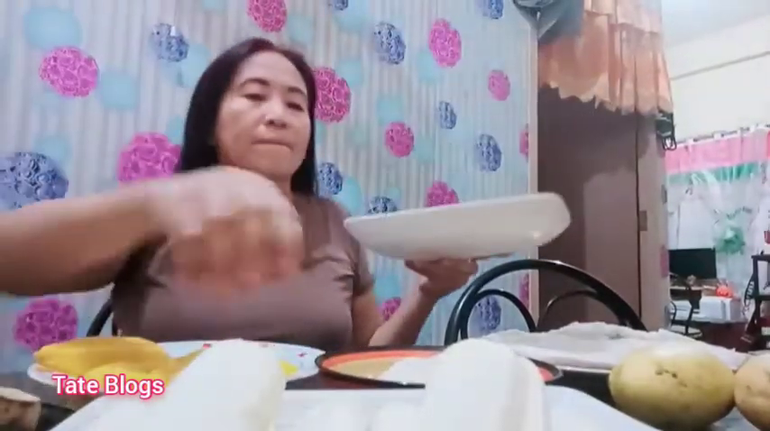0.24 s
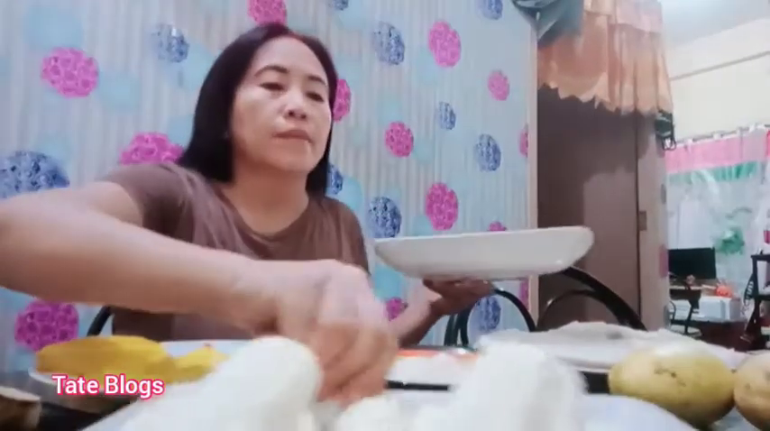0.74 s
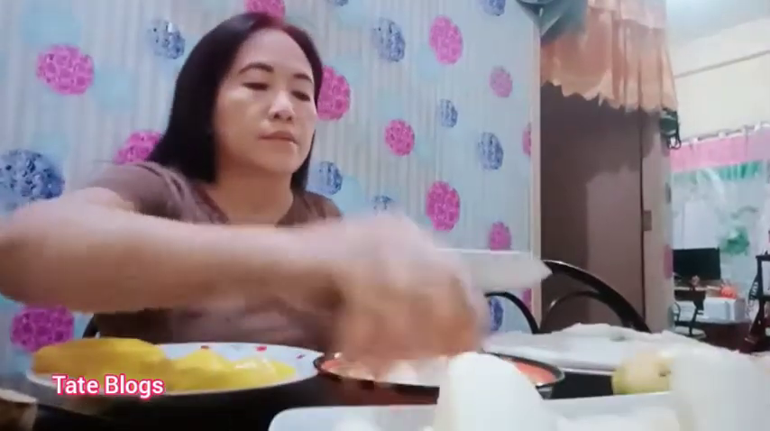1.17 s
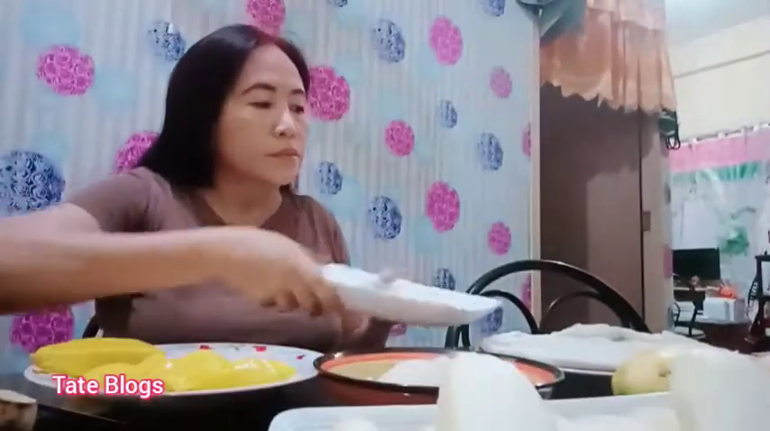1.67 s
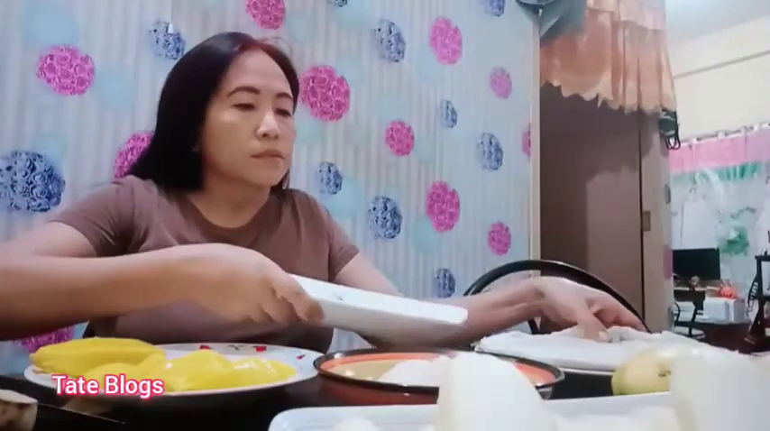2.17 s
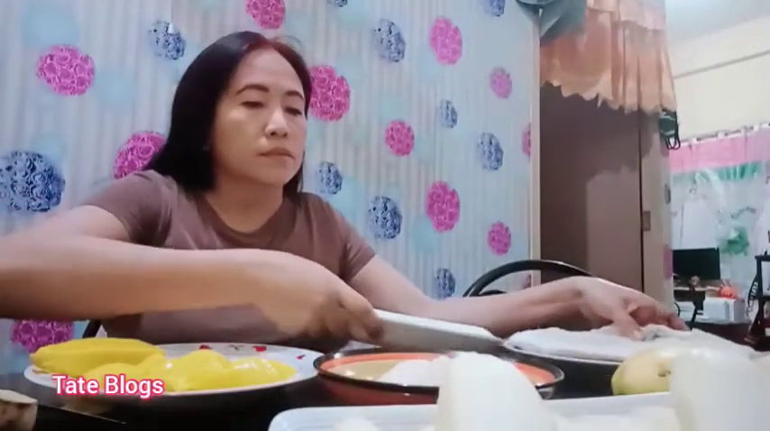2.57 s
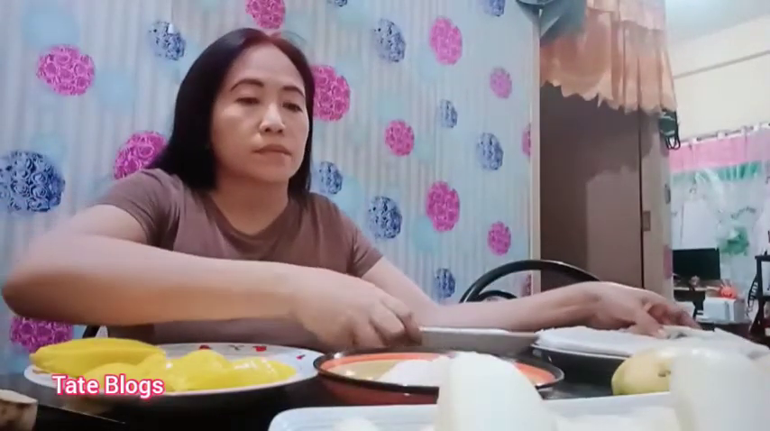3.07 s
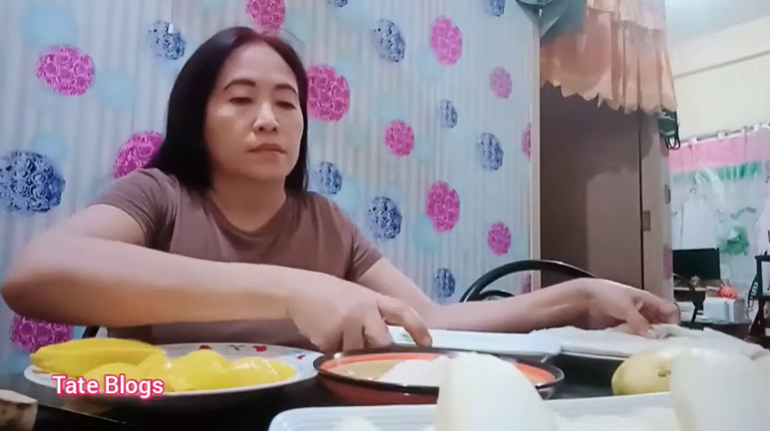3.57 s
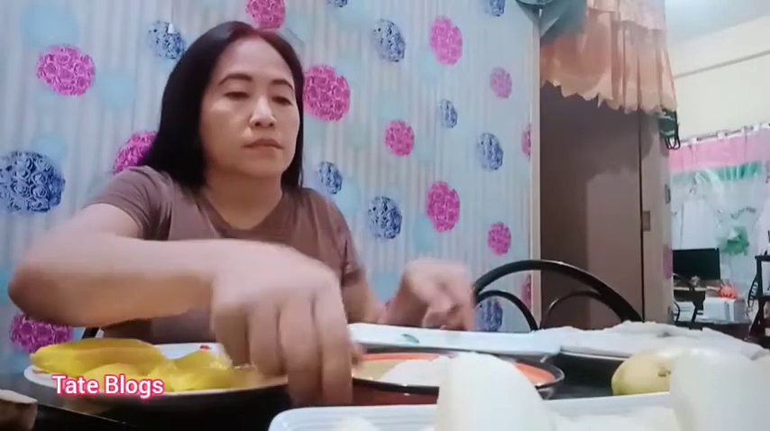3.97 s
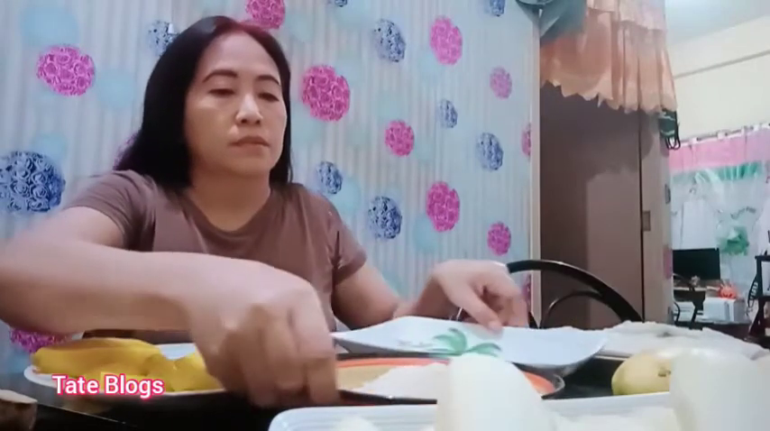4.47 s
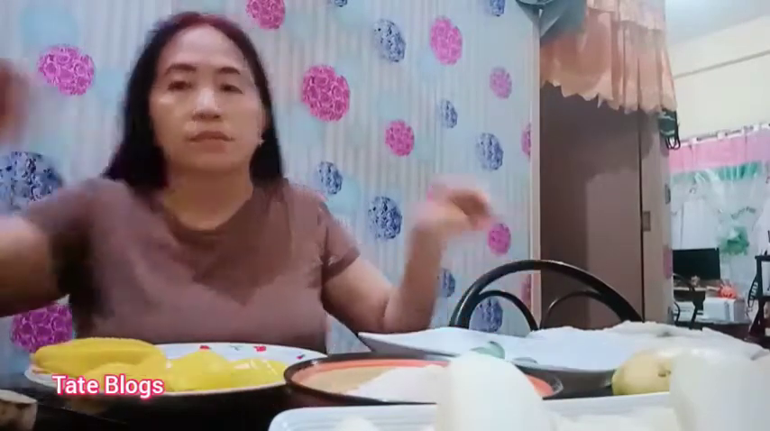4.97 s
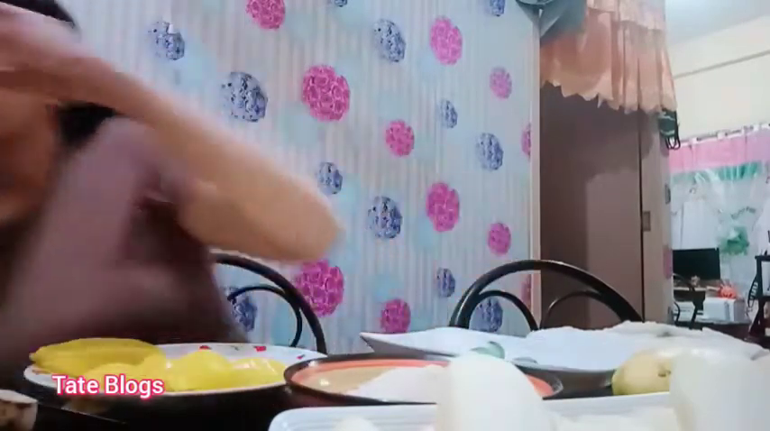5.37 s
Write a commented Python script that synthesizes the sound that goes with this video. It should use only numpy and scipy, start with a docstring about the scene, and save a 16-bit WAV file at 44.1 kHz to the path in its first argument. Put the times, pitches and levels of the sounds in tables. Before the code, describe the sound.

Light tray rustling, then sharp crockery clacks and a loud bowl set-down on a wooden tabletop, over quiet fan hum.

```python
"""Over steady air hush and a humming fan (noise and narrow-band tones), fingers rustle on a knocked tray.
A held plate, platter, saucer and plate follow on a wooden table, close to a phone in a small room;
a spoon chinks, a side plate and a bowl are set down, and last a chair shifts.
Knocks are short chattering bursts, drags streams of slips; both drive damped sines and snaps of noise
for the thing and the tabletop. Sparse decaying echoes make the room."""
import sys
import numpy as np
from scipy import signal
from scipy.io import wavfile
from scipy.ndimage import uniform_filter1d

SR = 44100
rng = np.random.default_rng(int(sys.argv[2]) if len(sys.argv) > 2 else 0)


def voltage_ratio(level):
    """Linear amplitude factor for a level in decibels (scalar or array-like)."""
    return 10 ** (np.asarray(level, float) / 20)


def to_wav(sig):
    """Store sig (one row per channel, or 1-D mono) as 16-bit WAV at the path in sys.argv[1].

    Samples outside -1..1 are clipped; the rate is SR.
    """
    pcm = np.clip(np.atleast_2d(sig), -1, 1) * 32767
    pcm = np.round(pcm).astype(np.int16)
    wavfile.write(sys.argv[1], SR, pcm.T)  # frames by channels


N = 247401


def evened(x):
    """Scales to rms 1."""
    return x / np.sqrt(np.mean(x ** 2) + 1e-20)


def read(points, hz):
    """Reads a spectrum on a log-frequency axis."""
    point_hz, value = np.transpose(points)
    return np.interp(np.log(hz + 1), np.log(point_hz + 1), value)


def add(mix, start_s, sound):
    """Mixes a sound in at start_s."""
    part = mix[round(start_s * SR):][:len(sound)]
    part += sound[:len(part)]


# Air noise spectrum. Each row: frequency in Hz, relative density in dB.
HUSH = [(15, -51), (25, -11), (84, -16.5), (111, 14.5), (145, -10.5), (170, -9.5), (277, 1.5), (309, -10),
        (344, -3), (962, -7), (1040, -9.5), (1130, -11), (3620, -19.5), (4870, -40), (16000, -61.5)]


def hush():
    """Air noise, shaped in frequency, with drifting patches and a slow swell."""
    frames, hz = N // 256 + 5, np.fft.rfftfreq(1024, 1 / SR)
    real, imag, patches = rng.standard_normal((frames, 513, 3)).T
    patches = uniform_filter1d(patches, 10, axis=0)  # across frequency
    patches = evened(uniform_filter1d(patches, 16, axis=1))  # across time
    swell = evened(uniform_filter1d(rng.standard_normal(frames), 40))
    drift_db = 1.3 * patches + 0.6 * swell
    spectrum = (real + 1j * imag) * voltage_ratio(read(HUSH, hz)[:, None] + drift_db)
    noise = signal.istft(spectrum, nperseg=1024, noverlap=768)[1][:N]
    return voltage_ratio(-49.5) * evened(noise)


# Fan tones. Each row: pitch in Hz, bandwidth in Hz, rms level in dB, steady part relative to noise rms.
FAN = [(113.5, 7.7, -62.5, 0.28), (177.3, 13.4, -56.5, 0.85), (880, 7.1, -66.5, 0.084),
       (1059, 31, -59.5, .1), (5076, 12, -86.5, 3)]


def fan():
    """Each tone is a steady part plus a narrow band of noise around its pitch."""
    t_s, out = np.arange(N) / SR, np.zeros(N)
    for hz, width_hz, level_db, steady in FAN:
        noise = rng.standard_normal(N) + 1j * rng.standard_normal(N)
        slow = signal.lfilter(*signal.butter(2, width_hz / 2, fs=SR), noise)
        wander = steady + slow / np.std(slow)
        tone = (wander * np.exp(2j * np.pi * hz * t_s)).real
        out += voltage_ratio(level_db) * evened(tone)
    return out


def harder(force, treble_db, hz=1800):
    """A harder contact carries more force above hz; two shelves make the turn steep."""
    for _ in range(2):
        low = signal.lfilter(*signal.butter(1, hz, fs=SR), force)
        force = low + voltage_ratio(treble_db / 2) * (force - low)
    return force


def grains(count, per_s, spread_db):
    """Sparse slips of random sign and uneven size."""
    draw, size, sign = rng.random((count, 3)).T
    uneven = voltage_ratio(-spread_db * np.log(size + 0.0054))
    return (draw < per_s / SR) * uneven * np.sign(sign - 0.5)


# Ringing modes of each thing. Each row: frequency in Hz, level before spot scatter in dB,
# t60 in seconds before body() limits it and grip shortens it.
FOOD_TRAY = [(2020, 7, 0.016), (2430, -14, 0.017), (2850, 0, 0.016), (3580, 3, 0.012), (4230, -18, 0.014),
             (6700, 10, 0.0097), (7860, 11.5, .008)]
HELD_PLATE = [(480, 2.5, 0.054), (890, 15.5, 0.0091), (1130, -11, .02), (1500, 16, 0.011),
              (1976, 12, 0.012), (2556, 3, 0.032), (3115, -5.5, 0.11), (3640, -19, 0.025),
              (4280, -2, 0.014), (4820, -3, 0.049), (6130, 1, 0.023), (8100, -9, 0.027)]
PLATTER = [(697, -6.5, 0.07), (1088, 5, 0.11), (1100, -14, .06), (1590, -11, 0.13), (1930, -8, 0.038),
           (2840, -1, 0.023), (3536, 1.5, 0.032), (4270, -18, .03), (4940, -22, 0.025), (5650, -9, 0.02)]
SAUCER = [(296, 5, 0.11), (354, 3, 0.11), (482, 3, 0.13), (1086, 4, 0.026), (1694, 4.5, 0.033),
          (2176, -0.5, 0.024), (2614, 0, 0.021), (2940, -19, 0.029), (3740, -8, 0.021)]
PLATE = [(351, -6.5, 0.037), (1100, -5, 0.01), (1170, 0.5, 0.026), (1510, 6, 0.011), (1753, 8, 0.024),
         (2060, 9.5, 0.0087), (2475, 7.5, 0.016), (2450, -3, 0.016), (2883, 4, 0.036), (3120, 1, 0.017),
         (3060, -3, 0.018), (3420, 2, 0.025), (3720, 1, 0.021), (6040, 0.5, 0.022), (6840, -14, 0.044)]
SPOON = [(1540, 3, 0.089), (2523, 9.5, 0.037), (3800, 6, 0.11), (5200, -2, .12), (7000, 0, .12)]
SIDE_PLATE = [(605, 8, 0.0033), (875, 4, 0.0071), (1230, -2, 0.0084), (1540, 7, 0.021), (1780, 5, 0.024),
              (2520, 6.5, 0.013), (2770, -11, 0.034), (3700, 1.5, 0.038), (5130, -11.5, .04)]
BOWL = [(730, -9, 0.052), (1058, -1, 0.072), (1340, -7.5, 0.029), (1613, 5.5, 0.017), (1670, -4.5, 0.081),
        (1760, 8, 0.018), (2040, -3, 0.019), (2260, 2.5, 0.013), (2380, 0, 0.032), (2895, 3.5, 0.023),
        (3410, 1.5, 0.015), (3680, -1, 0.016), (4580, -27, 0.023), (6150, -5, 0.025)]
CHAIR = [(670, 18, 0.0069), (935, 2, 0.014), (3000, -22, 0.0055)]


def body(modes, crack_db, spot_db, grip=1, crack_ms=2.23):
    """Unit-energy answer to a push at a chance spot: dying sines and a snap of countless damped modes."""
    t_s, (hz, mode_db, t60_s) = np.arange(6000)[:, None] / SR, np.transpose(modes)
    mode_db = mode_db + spot_db * rng.standard_normal(len(hz))  # each spot favours other modes
    decay_db = 60 * grip * t_s / np.clip(t60_s, 0.004, 0.5)
    tones = (voltage_ratio(mode_db - decay_db) * np.sin(2 * np.pi * hz * t_s)).sum(1)
    snap = rng.standard_normal(len(t_s)) * np.exp(-t_s[:, 0] * 1000 / crack_ms)
    both = tones / np.linalg.norm(tones) + voltage_ratio(crack_db) * snap / np.linalg.norm(snap)
    return both / np.linalg.norm(both)


# Tabletop modes. Each row: frequency in Hz, level before spot scatter in dB, t60 in seconds before grip.
TABLETOP = [(112.7, 6.5, 0.095), (202, 3, 0.054), (256, -9, 0.095), (310, -1.5, 0.031), (359, -1.5, 0.086),
            (480, 3.5, 0.01), (630, -10.5, 0.021), (760, -10, 0.0091)]


def tabletop():
    """The wooden table's damped modes, pushed at a chance spot."""
    return body(TABLETOP, crack_db=-31, spot_db=0.5, grip=0.8)


# Things by name. Each row: modes, mean slips per second when dragged, snap beside the ring in dB,
# thud drive beside the ring drive when dragged in dB.
THINGS = {"tray": (FOOD_TRAY, 2300, 9.3, -2.5), "held plate": (HELD_PLATE, 9000, -1.5, -4.5),
          "platter": (PLATTER, 2100, 1.7, -1.7), "saucer": (SAUCER, 1000, -22, -14),
          "plate": (PLATE, 2975, 0, 0.5), "side plate": (SIDE_PLATE, 2000, 0.5, -2.5),
          "bowl": (BOWL, 2700, 3.8, -3), "spoon": (SPOON, 1000, -16, -9), "chair": (CHAIR, 6100, 3.3, -7)}
# Knocks by thing. Each row: start in seconds, ring peak in dB, thud peak in dB (both before room and
# microphone), treble force in dB, chatter decay in ms before limits.
KNOCKS = { "tray": [(0.021, -18.5, -43, 19, 14.6), (0.458, -20, -48, 4, 1.5), (0.468, -18, -39, 23, 11),
          (0.529, -21, -30.5, 2, 2.8), (0.563, -26, -41, 3, 5.6), (0.629, -29.5, -40, -4, 18),
          (0.665, -27, -41, -2, 4.7), (0.819, -21.5, -27.5, -1, 4.7), (0.848, -31, -31, -2, 9.4),
          (0.863, -23.5, -22.5, -8.5, 3), (0.919, -28.5, -41, 11, 2.5)],
          "held plate": [(1.402, -39, -48, -25, 4), (1.839, -38, -27, 10, 8.2),
          (2.053, -41, -29.5, -33, 6.3), (2.144, -30, -45, 22, 3.4), (2.265, -28.5, -38, 0, 7.8),
          (2.458, -34, -20, -22, 4.8), (2.469, -24.5, -28, -35, 10)],
          "platter": [(2.656, -4.5, -16, 4.5, 0.42), (2.692, -6.5, -24, 4.5, 0.98)],
          "saucer": [(2.84, -21, -46.5, 10.5, 8.5), (2.914, -25, -38, 10.5, 2.1),
          (2.966, -25.5, -44, -6, 2), (3.045, -32, -46, 5, 4.9), (3.069, -34, -45, -5, 4.2)],
          "plate": [(3.096, -13, -24.5, 0, 6.4), (3.118, -12.5, -31.5, 0.5, 11),
          (3.144, -15, -30, -8.5, 21), (3.2, -22, -35, -8, 9), (3.228, -24, -22.5, 3, 6.4),
          (3.391, -6.5, -35, 4, 17), (3.409, -8, -18, -3.5, 8.2)], "spoon": [(3.574, -37.5, -43, -12, 9),
          (3.592, -37.5, -55, 0, 12)], "side plate": [(4.135, -23, -54, -18, 2.1),
          (4.216, -26.5, -32, -8, 27), (4.244, -28, -18.5, -19, 4), (4.317, -18, -18.5, -32, 8.9)],
          "bowl": [(4.442, -14, -19, -13, 4.6), (4.453, -8, -20.5, -8, 15), (4.567, -10, -12, 4, 33),
          (4.581, 3.5, -7.5, 10, 6.7), (4.611, -7.5, -14, -16, 4.2), (4.624, -13, -8.5, 1, 3.8),
          (4.647, -5.5, -17, 2.5, 5.2)], }


def knock(thing, start_s, ring_db, thud_db, treble_db, chatter_ms):
    """One blow, heard through the thing and through the table under it."""
    modes, _, crack_db, _ = THINGS[thing]
    t_ms = np.arange(4096) / SR * 1000
    chatter_ms = np.clip(chatter_ms, 0.5, 40)
    bounces = evened(grains(4096, per_s=6000, spread_db=2.0))
    blow = bounces * np.exp(-t_ms / chatter_ms)  # the rim settles in tiny bounces
    blow *= 1 - np.exp(-t_ms / (0.033 * chatter_ms))
    blow /= np.linalg.norm(blow)
    blow[0] = 2.9 / chatter_ms  # a clean blow puts its force in the first touch
    ring = signal.fftconvolve(harder(blow, treble_db), body(modes, crack_db, spot_db=1.0))
    thud = signal.fftconvolve(blow, tabletop())
    return start_s, voltage_ratio(ring_db) * ring / abs(ring).max() + voltage_ratio(thud_db) * thud / abs(thud).max()


# Drags, rustles and rattles by thing. Each row: start in seconds, time before the fade in seconds,
# slip drive before lumps in dB, fade in dB per second, treble force in dB.
DRAGS = { "tray": [(0.03, 0.022, -54.5, 98, 12.5), (0.44, 0.024, -51, 156, 9), (0.52, 0.1, -58, 28, 8.5),
         (0.795, 0.035, -50.5, 62, 6.5)], "held plate": [(1.81, 0.026, -52.5, 400, -6),
         (2.13, 0.12, -60, 150, 15.5), (2.262, 0.067, -41.5, 57, 3.5), (2.48, 0.011, -40, 396, -19),
         (2.53, 0.23, -65.5, 199, 24.5)], "platter": [(2.7, 0.017, -27, 498, -1)],
         "saucer": [(2.9, 0.27, -48, 100, -15)], "plate": [(3.1, 0.039, -26.5, 155, -2),
         (3.19, 0.21, -60, 153, 13), (3.415, 0.005, -23.5, 282, -3)],
         "side plate": [(4.02, 0.034, -53, 180, 5), (4.135, 0.059, -36, 90, -10),
         (4.215, 0.11, -32, 199, -14.5), (4.315, 0.0079, -26, 250, -16)],
         "bowl": [(4.46, 0.013, -20.5, 704, -1.5), (4.575, 0.085, -16.5, 420, 1.5)],
         "chair": [(5.17, 0.12, -48, 95, -11), (5.28, 0.12, -47, 51, 0)], }


def drag(thing, start_s, hold_s, ring_db, fade_db_per_s, treble_db, spots=5):
    """A lumpy stream of slips that sets in, holds and fades, ringing the thing and the table."""
    modes, slips_per_s, crack_db, thud_db = THINGS[thing]
    rise_ms, longest = 6, 24000  # longest in samples
    t_s = np.arange(longest) / SR
    fade_db = fade_db_per_s * np.maximum(t_s - hold_s, 0)
    pressure = np.minimum(t_s * 1000 / rise_ms, 1) * voltage_ratio(ring_db - fade_db)
    lumps_db = 1.73 * evened(uniform_filter1d(rng.standard_normal(longest), size=350))
    slips = evened(grains(longest, slips_per_s, spread_db=3.0)) * pressure * voltage_ratio(lumps_db)
    spot = rng.integers(0, spots, longest)  # the rim touches down now here, now there
    out = voltage_ratio(thud_db) * signal.fftconvolve(slips, tabletop())
    for k in range(spots):
        force = harder(slips * (spot == k), treble_db)
        damped = body(modes, crack_db, spot_db=1.5, grip=1.35)  # the hand damps the ring
        out = out + signal.fftconvolve(force, damped)
    return start_s, out


# Room decay. Each row: frequency in Hz, t60 in seconds.
ROOM = [(150, 0.41), (1000, 0.34), (4000, 0.35), (10000, 0.33)]


def room(x):
    """Sparse echoes of random sign, each band dying at its own speed."""
    taps, at = np.zeros(SR // 2), np.arange(150, SR // 2 - 20, 20)
    taps[at + rng.integers(0, 20, len(at))] = rng.choice([-1., 1.], len(at))
    hz, t_s, bands = signal.stft(taps, SR, nperseg=256)
    decay = voltage_ratio(-60 * t_s / read(ROOM, hz)[:, None])
    tail = signal.istft(bands * decay, SR, nperseg=256)[1]
    return signal.oaconvolve(x, tail / np.linalg.norm(tail))[:N]


# Response to nearby sounds. Each row: frequency in Hz, gain in dB.
MICROPHONE = [(30, -33), (90, -21.5), (170, 0.65), (3000, 3), (4200, -3.5), (5400, -20), (8500, -25.5),
              (10500, -42), (16000, -47.5)]


def microphone(x):
    """The microphone's causal response to nearby sounds: dull above the presence range."""
    hz = np.abs(np.fft.fftfreq(4096, 1 / SR))
    log_gain = np.log(voltage_ratio(read(MICROPHONE, hz)))
    taps = np.fft.ifft(np.exp(np.conj(signal.hilbert(log_gain)))).real[:2048]  # minimum phase
    return signal.oaconvolve(x, taps)[:N]


def scene():
    """Things and table with their room echo, through the microphone, over hush and fan."""
    near = np.zeros(N)
    for table, play in (KNOCKS, knock), (DRAGS, drag):
        for thing, rows in table.items():
            for row in rows:
                add(near, *play(thing, *row))
    echoed = near + voltage_ratio(-9.0) * room(near)
    return (microphone(echoed) + hush() + fan())[None]


def roll_off(x):
    """The treble ends steeply here."""
    return signal.sosfilt(signal.butter(12, 16500, fs=SR, output="sos"), x)


def record(dry):
    """The input rounds off the loudest peaks."""
    ceiling = 0.85  # of full scale
    mix = ceiling * np.tanh(dry / ceiling)
    return roll_off(mix)


dry = scene()
out = record(dry)
to_wav(out)
```